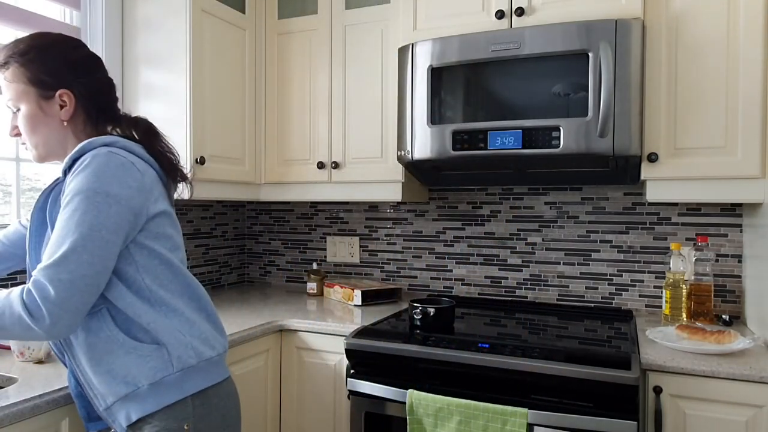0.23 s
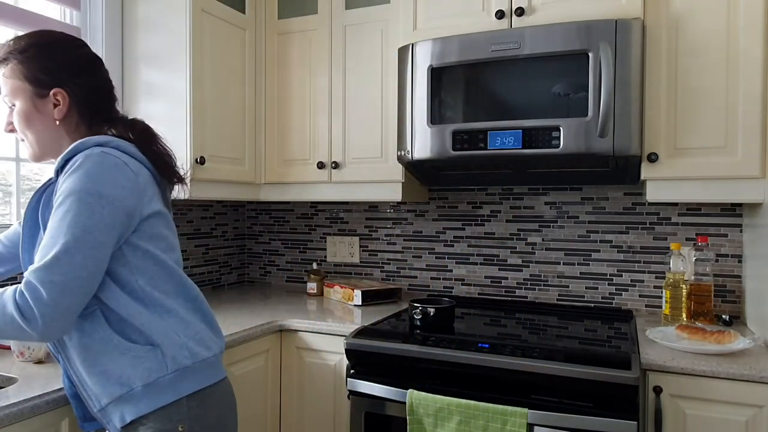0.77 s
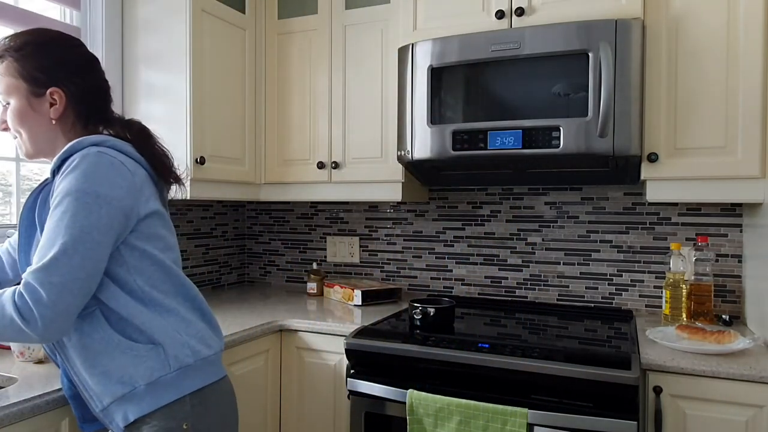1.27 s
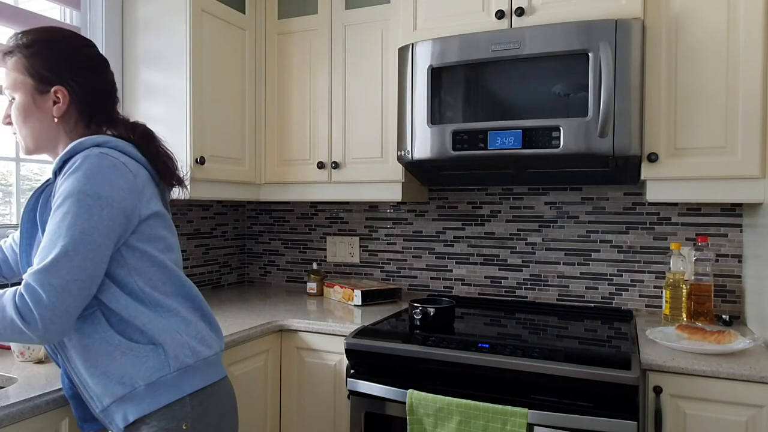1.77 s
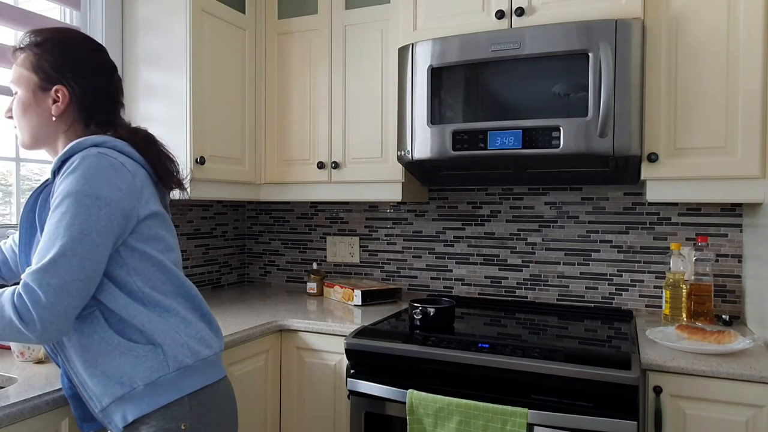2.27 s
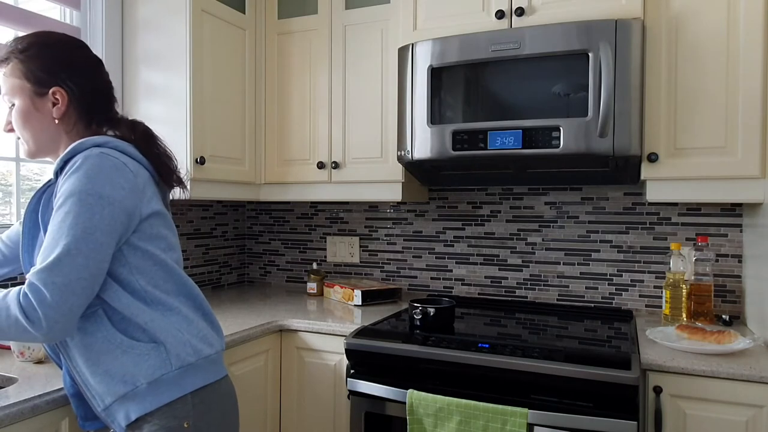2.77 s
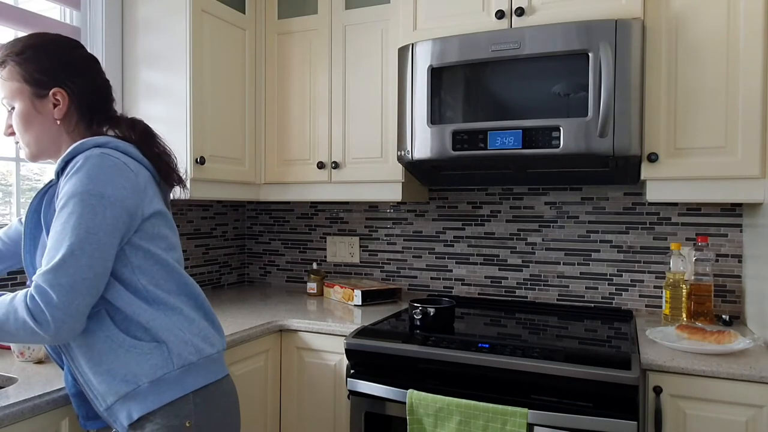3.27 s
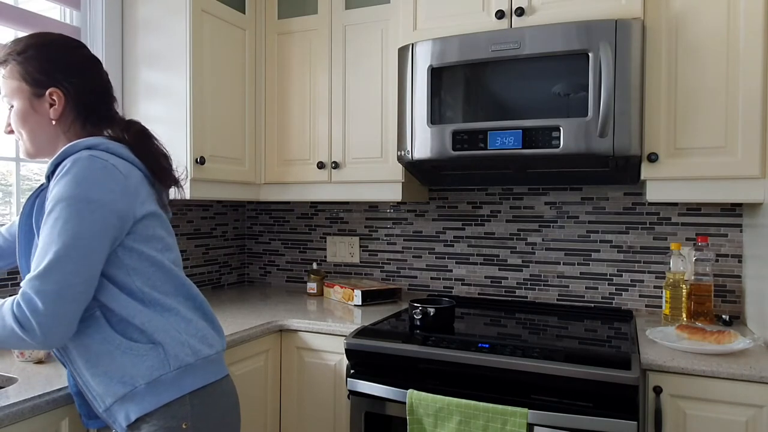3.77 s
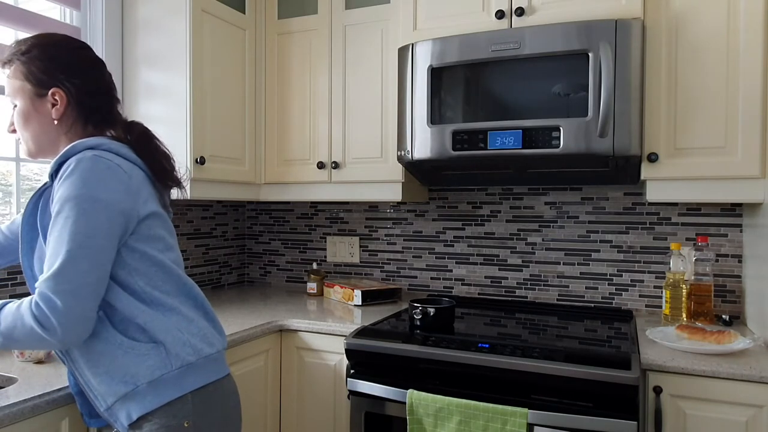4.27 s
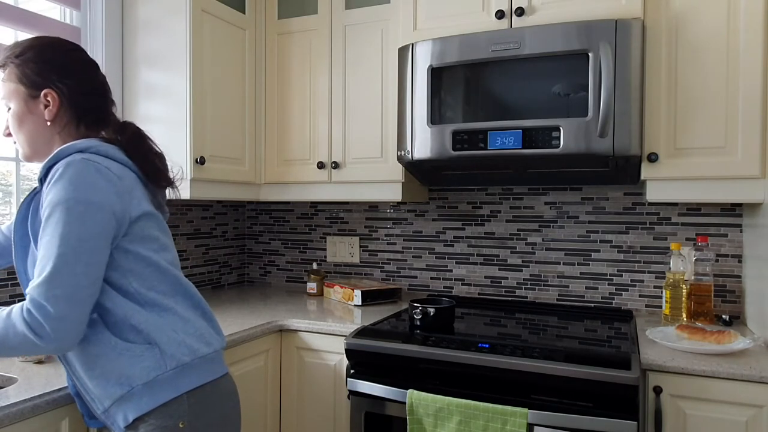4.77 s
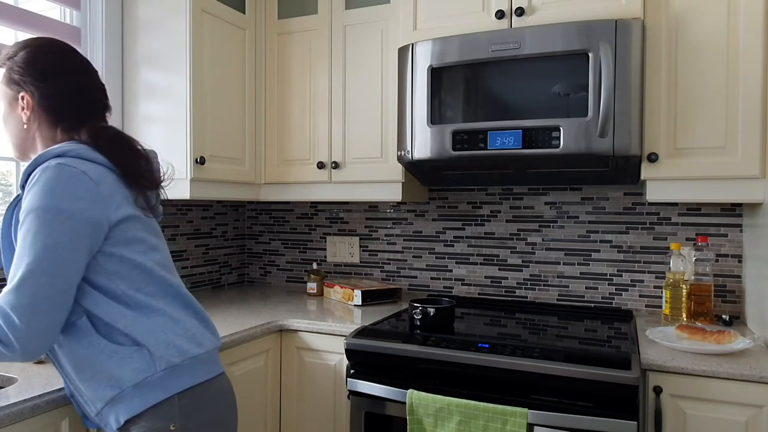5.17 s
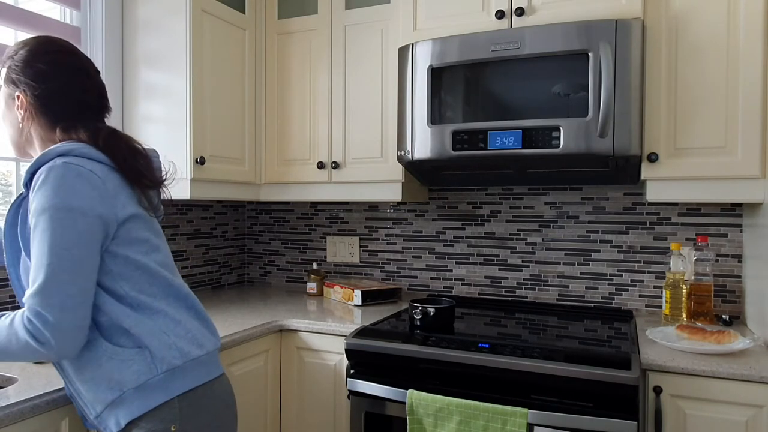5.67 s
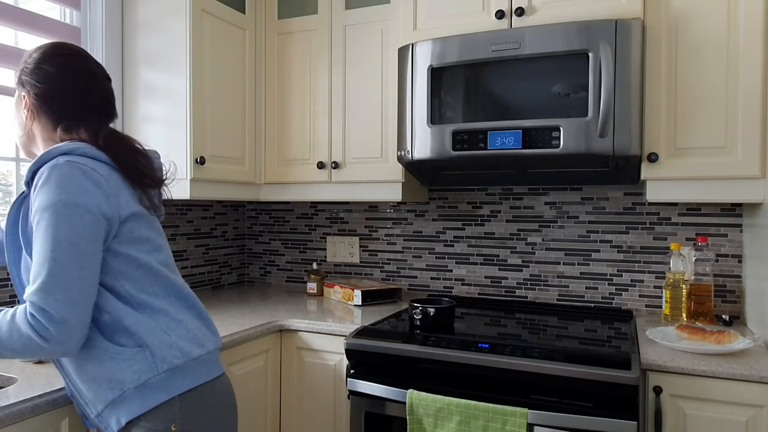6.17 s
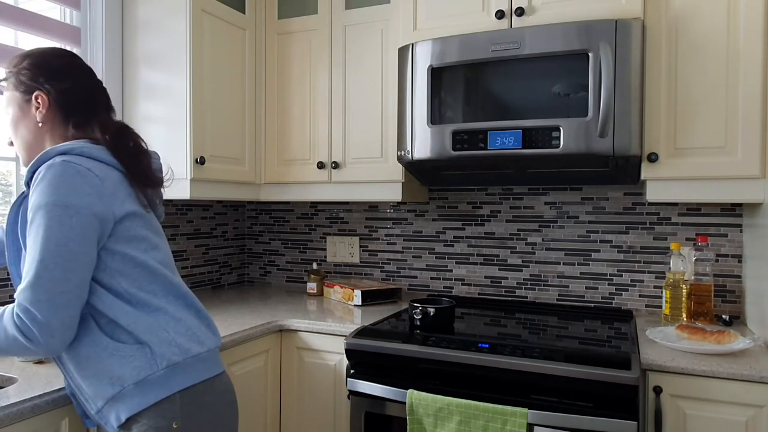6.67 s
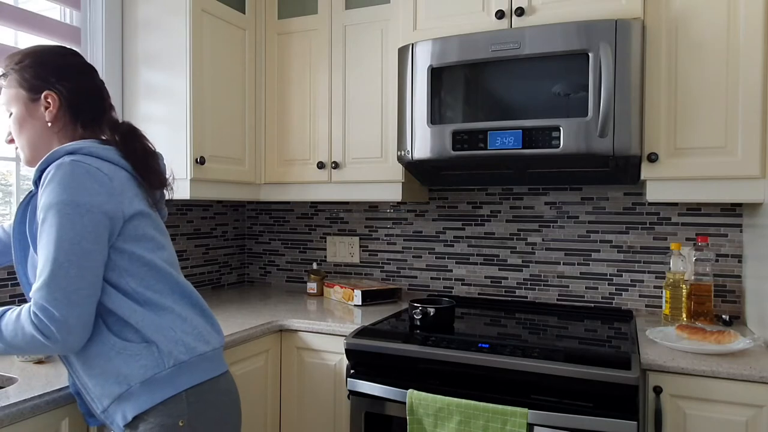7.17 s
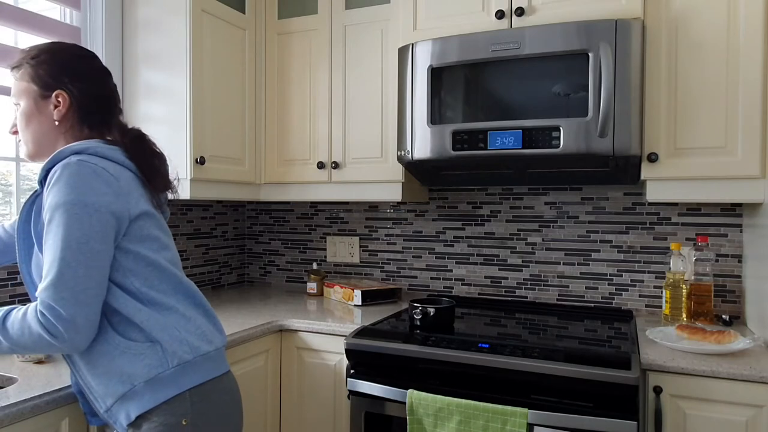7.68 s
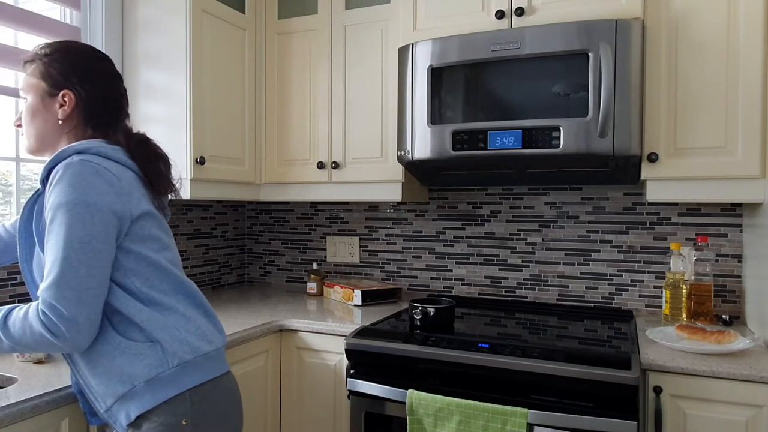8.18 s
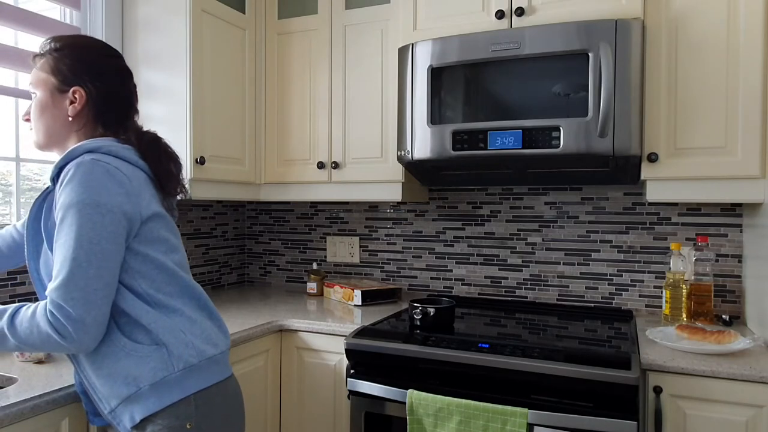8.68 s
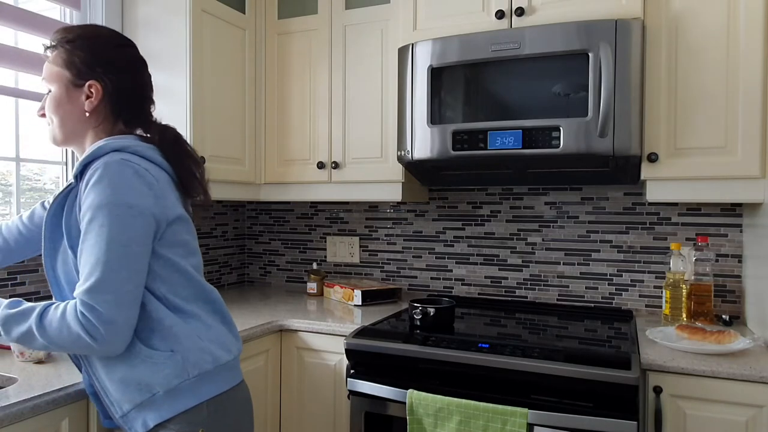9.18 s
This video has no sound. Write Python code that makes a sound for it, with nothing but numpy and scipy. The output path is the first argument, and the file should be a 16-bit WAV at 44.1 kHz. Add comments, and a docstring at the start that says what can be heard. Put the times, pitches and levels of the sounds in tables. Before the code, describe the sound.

A kitchen tap blasts loudly into a bare steel pan, softens into bubbling, fizzing water, then shuts abruptly with a gulp and soft pan bumps.

```python
"""First a hard jet drums on bare steel and sprays: a kitchen tap runs into a saucepan in the sink.
Deeper water then cushions it and fizzes with bubbles; a last gulp shuts the tap, the kitchen rings out
and the pan bumps softly against the sink. The two microphones stand a few steps away, the sink to their left.
Drops are filtered random impacts, bubbles are short rising rings, the steel sink is a bank of resonators,
and reflections with a decaying noise tail make the kitchen."""
import sys
import numpy as np
from scipy import signal
from scipy.fft import rfft, irfft, next_fast_len
from scipy.io import wavfile
from scipy.ndimage import map_coordinates

SR = 44100
rng = np.random.default_rng(int(sys.argv[2]) if len(sys.argv) > 2 else 0)


def store_pcm(level_fs):
    """Save levels as 16-bit WAV."""
    pcm = np.round(np.clip(level_fs, -1, 1) * 32767).astype(np.int16)
    wavfile.write(sys.argv[1], SR, np.atleast_2d(pcm).T)


N = 415422
T = np.arange(N) / SR  # time, s

# All levels are relative: later stages colour and rescale them.
# How hard the jet sprays as it meets steel or water; columns: t/s, level/dB
SPRAYING = [(0.0, -16), (0.02, -20), (0.38, -20.5), (0.43, -23.5), (1.07, -24), (1.14, -27.5), (1.3, -25),
            (1.42, -27), (1.78, -29), (1.85, -27), (2.08, -29), (2.17, -34), (2.24, -31.5), (2.62, -34.7),
            (3.05, -33.8), (3.81, -34.5), (3.93, -30.5), (4.1, -33.5), (4.4, -32.5), (4.72, -30.5),
            (4.98, -32), (5.25, -31.5), (5.43, -33), (5.82, -30.5), (6.22, -31.5), (6.38, -32.5),
            (6.63, -35.5), (7.2, -34.5), (8.56, -35.5)]
# The jet catches the wall of the pan and spits; columns: t/s, level change/dB, length/s
SPITS = [(0.079, 2, 0.015), (0.34, -0.5, .02), (.705, 3.5, 0.013), (.955, 1, 0.011), (1.325, 5.5, 0.01),
         (3.93, 1, 0.026), (4.245, 5.5, 0.013), (4.513, 9, .008), (4.595, 4, 0.013), (5.179, 6.5, .007),
         (5.632, 4, 0.012), (5.678, 2, .008), (5.83, 4, .01), (5.889, 0, .007), (6.01, 2, .008),
         (6.249, 9.5, .008), (6.44, 5, .009)]
# Pockets of air dragged under, the last as the tap shuts;
# columns: t/s, length/s, lowest f/Hz, highest f/Hz, level/dB
GURGLES = [(0.242, 0.14, 560, 882, -31), (4.1, 0.51, 530, 610, -44), (4.26, .04, 750, 1400, -39),
           (4.7, 0.29, 1620, 1950, -41.5), (4.8, .16, 1130, 1320, -43.5), (4.904, 0.37, 772, 903, -42),
           (5.95, .28, 1313, 1900, -45), (8.674, .055, 652, 1560, -38)]
# The pan against the sink; columns: t/s, scuff level/dB, scuff length/s, knock level/dB
BUMPS = [(9.17, -49.5, 0.012, -36), (9.192, -49.5, 0.019, -33), (9.217, -51.5, 0.061, -27),
         (9.276, -57, 0.032, -16), (9.296, -56, 0.15, -30)]

# Spectrum of the droplets as the microphones colour it, with their dip near 7.5 kHz and lift near 9 kHz;
# columns: f/Hz, level per Hz/dB
SPRAY_SPECTRUM = [(1300, -26), (2150, -19), (2450, -4), (2900, -2.5), (3400, -1), (5200, -1), (6000, 0.4),
                  (6900, 1), (7450, -3), (8000, -2), (8750, 3.5), (9400, 4), (10400, 1.5), (11500, 2),
                  (12400, 2.8), (13400, -0.3), (14300, 0.2), (15200, 2), (16000, -0.5)]
# Spectrum of the jet on bare steel; columns: f/Hz, level per Hz/dB
BARE_SPECTRUM = [(180, -45), (300, -13.5), (366, -9.5), (425, -18), (470, -12.5), (581, -4), (690, -2.5),
                 (800, -2.5), (930, -9.5), (1020, -1.5), (1130, -8.5), (1290, 0), (1600, -5), (1960, -6.5),
                 (2160, -7.5), (2430, -3), (3120, -30.5), (5280, -120)]
# Spectrum of the jet in the water that covers the steel; columns: f/Hz, level per Hz/dB
COVERED_SPECTRUM = [(200, -36.5), (300, -10), (420, -4), (500, -0.5), (600, 3), (700, -8), (800, -3.5),
                    (950, -5.5), (1110, -4.5), (1300, -4.5), (1550, -5), (1750, -3.5), (2130, -5.5),
                    (2400, -2), (3120, -34), (5280, -120)]
# Spectrum of the bubble cloud; columns: f/Hz, level per Hz/dB
FIZZ_SPECTRUM = [(1200, -31.5), (2100, -10), (2600, -2.5), (3100, -0.2), (3500, -0.9), (4700, 2), (6500, 0),
                 (7600, -1), (12000, -39), (16000, -31.5)]
# Spectrum of the plunging water's rumble; columns: f/Hz, level per Hz/dB
RUMBLE_SPECTRUM = [(20, -11), (40, -9.5), (62, -15.5), (85, -8), (115, 1), (200, -6), (280, -4.5),
                   (370, 1.5), (520, 6), (620, 2.5), (780, -6.5), (1100, -18.5), (3000, -61)]
# Spectrum of the closing valve's dull thud; columns: f/Hz, level per Hz/dB
THUD_SPECTRUM = [(20, -13), (55, -7), (100, 1), (190, -5), (300, -17), (1000, -53)]
# Spectrum of the pan scuffing the sink; columns: f/Hz, level per Hz/dB
SCUFF_SPECTRUM = [(40, -20), (80, -21.5), (120, 0.5), (175, -1), (245, -5), (350, -4.5), (470, -6.5),
                  (600, -3), (760, -3.5), (1100, -17.5), (2100, -17.5), (3200, -25), (6300, -27),
                  (8000, -36), (15000, -40.5)]
# Spectrum of the quiet room tone; columns: f/Hz, level per Hz/dB
ROOM_TONE_SPECTRUM = [(18, -48), (30, -32), (203, 4.5), (402, -19), (645, -15), (1380, -13), (1530, -28.5),
                      (3940, -18), (15800, -26)]

# Resonances of the pan wall; columns: f/Hz, width/Hz, lift/dB
PAN_MODES = [(1400, 110, 3), (1970, 160, 2.5), (2480, 110, 2), (3210, 25, 3), (3520, 160, 1.5),
             (4600, 45, 2), (5927, 55, 2), (8812, 60, 1.4)]
# Resonances of the sink with the pan in it;
# columns: f/Hz, width/Hz, level when shaken by water/dB, level when bumped/dB
SINK_MODES = [(123, 26, -14, -17), (176, 6, 1.5, -22.5), (218, 11, 0.5, -19), (243.4, 4, -7, -3),
              (491.4, 5.8, -2, -7), (558.6, 3, 1, 4), (581, 40, 2.5, -14.5), (614, 3.2, -2, -4.5)]
# Reverberation of the kitchen; columns: f/Hz, time to decay by 60 dB/s
KITCHEN_DECAY = [(100, 0.55), (500, 0.75), (1600, 0.67), (3500, 0.78), (8000, 0.5), (15000, 0.5)]
# Likeness of the two microphone signals; columns: f/Hz, correlation (-1 opposed, 1 same)
LIKENESS = [(30, -0.66), (70, 0.14), (140, 0.98), (260, 0.68), (550, 0.4), (1000, -0.033), (2000, -0.026),
            (16000, 0.08)]
# Balance of the two microphones; columns: f/Hz, left minus right level/dB
BALANCE = [(200, -0.5), (600, 1.5), (1200, 1), (3200, 0.5), (5000, 2), (6900, 3.5), (7900, 1), (8800, -3),
           (10500, -1), (12000, -0.5), (15500, 2)]

# Water covers the spot where the jet lands
COVER_START_S, COVER_END_S = 2.06, 2.19
# The spray of a jet that plunges smoothly; any more is spatter, fully wild at WILD_DB above calm
CALM_DB, WILD_DB = -33, 2.5
SPUTTER_CALM_DB, SPUTTER_WILD_DB = 1.4, 2  # how deeply the spray wavers
# Level under a calm jet, and dB gained per dB of spatter
STEEL_DB, STEEL_PER_SPATTER = -31, 0.12
WATER_DB, WATER_PER_SPATTER = -39, 0.76
FROTH_DB, FROTH_PER_SPATTER = -31.5, 0.38
RUMBLE_DB, RUMBLE_PER_SPATTER = -44, -0.49  # water that spatters does not plunge
CHURN_DB = -43  # the steady shaking of the sink
SURGE_S, SURGE_DB, SURGE_LENGTH_S = 2.05, 1.7, 0.028  # the drumming swells briefly
FROTH_FULL_S, FROTH_DB_PER_S = 2.3, 7.5  # the bubble cloud builds up until then
BURBLE_PEAK_S = 5.6  # at this depth the jet burbles loudest
SHALLOW_DB_PER_S, DEEP_DB_PER_S = 0.3, 0.9  # growth of the burble before that, muffling after
CLOSING_S = 8.578  # the valve starts to close, and the stream draws less and less air
SPRAY_CLOSE_DB_PER_S, FROTH_CLOSE_DB_PER_S = 130, 90
GULP_S, GULP_DB, GULP_LENGTH_S = 8.67, -43, 0.05  # the valve closes
SLUG_S, IMPACT_CLOSE_DB_PER_S = 8.69, 73  # the last slug of water lands, then the splash dies
SLOSH_S, SLOSH_DB, SLOSH_LENGTH_S = 8.69, 5.5, 0.1  # the pan heaves as the stream slackens
SHUT_S, DRAIN_S = 8.76, 0.024  # the last water lands; time constant of its decay
ROOM_TONE_DB = -64.5
LEFT_LEAD_S = 0.00037  # direct sound reaches the left microphone first
EDGE_HZ = 15930  # upper edge of the sound's band


def gain_of(db):
    """Amplitude factor of a level in dB."""
    return 10 ** (np.asarray(db) / 20)


def evened(x):
    """Scale to an rms of 1."""
    return x / np.sqrt(np.mean(x ** 2) + 1e-20)


def read(points, hz):
    """A spectrum, joined by straight lines on a log-frequency axis."""
    f, value = np.transpose(points)
    return np.interp(np.log(hz + 1), np.log(f + 1), value)


def swell(s, length):
    """A brief bell-shaped rise from 0 to 1 and back."""
    return np.exp(-((T - s) / length) ** 2)


def colour(x, spectrum, modes=(), size=8192):
    """Causal filter: a broad spectrum lifted by ringing resonances; rms 1."""
    hz = np.fft.rfftfreq(size, 1 / SR)
    db = read(spectrum, hz)
    for f, width, lift in modes:
        db = db + lift / (1 + (2 * (hz - f) / width) ** 2)
    # folding the cepstrum forward in time gives minimum phase
    cepstrum = irfft(np.log(gain_of(db)))[:size // 2]
    cepstrum[1:] *= 2
    ring = irfft(np.exp(rfft(cepstrum, size)))[:size // 2]
    return evened(signal.oaconvolve(x, ring[None], axes=1)[:, :N])


def hiss(channels=4):
    """Unrelated noise, by default for four spots in the sink."""
    return rng.standard_normal((channels, N))


def drops(per_s, spread_db):
    """Random impacts: most are small, a few large."""
    push = hiss()
    size = np.minimum(rng.exponential(1, push.shape), 6)
    lands = rng.random(push.shape) < per_s / SR
    return evened(np.sign(push) * gain_of(spread_db * size) * lands)


def sputter(depth_db, slow_hz, fast_hz, count=60):
    """The unsteady jet: a gain that wavers at many rates."""
    t = T[::64]
    rates = np.geomspace(slow_hz, fast_hz, count)[:, None]
    waves = np.sin(2 * np.pi * (rates * t + rng.random((count, 1))))
    return gain_of(depth_db * np.interp(T, t, evened(waves.sum(0))))


def patchy(x, depth_db, span_hz, span_s):
    """Random gains that drift over time and frequency make the noise uneven."""
    hz, s, z = signal.stft(x, SR, nperseg=512)
    knots = rng.standard_normal((80, 900))
    places = np.meshgrid(hz / span_hz, s / span_s, indexing="ij")
    field = map_coordinates(knots, places, order=1, mode="mirror")
    uneven = z * gain_of(depth_db * evened(field))
    return evened(signal.istft(uneven, SR, nperseg=512)[1][:, :N])


def bubbles(low_hz, high_hz, cycles, spread_db, rise, count=9000, size=500, channels=4):
    """Each trapped bubble rings for some cycles and rises in pitch as it nears the surface."""
    when, pitch, strength = rng.random((count, 3)).T[:, :, None]
    turns = low_hz * (high_hz / low_hz) ** pitch * np.arange(size) / SR
    ring = np.exp(-turns / cycles) * np.sin(2 * np.pi * turns * (1 + rise * turns / cycles))
    fade = np.sqrt(np.linspace(1, 0, size))
    ring *= gain_of(-spread_db * np.log(strength + 0.084)) * fade
    # scatter over all channels laid end to end
    at = (when * (channels * N - size)).astype(int) + np.arange(size)
    return evened(np.bincount(at.ravel(), ring.ravel(), channels * N).reshape(channels, N))


def cover():
    """How far water covers the spot where the jet lands, 0 to 1."""
    return np.clip((T - COVER_START_S) / (COVER_END_S - COVER_START_S), 0, 1)


def filling():
    """Gains of spray, impact, fizz, rumble and churn follow spatter, rising water and closing valve."""
    jet_db = np.interp(T, *np.transpose(SPRAYING))
    spray_db = jet_db + sum(db * swell(s, length) for s, db, length in SPITS)
    spatter_db = jet_db - CALM_DB

    closing = np.maximum(T - CLOSING_S, 0)
    dying_db = IMPACT_CLOSE_DB_PER_S * np.maximum(T - SLUG_S, 0)
    slosh_db = SLOSH_DB * swell(SLOSH_S, SLOSH_LENGTH_S)
    depth_db = np.minimum(SHALLOW_DB_PER_S * (T - BURBLE_PEAK_S), DEEP_DB_PER_S * (BURBLE_PEAK_S - T))

    steel_db = STEEL_DB + STEEL_PER_SPATTER * spatter_db + SURGE_DB * swell(SURGE_S, SURGE_LENGTH_S)
    water_db = WATER_DB + WATER_PER_SPATTER * spatter_db + depth_db
    missing_froth_db = FROTH_DB_PER_S * np.maximum(FROTH_FULL_S - T, 0)
    froth_db = FROTH_DB + FROTH_PER_SPATTER * spatter_db - missing_froth_db
    rumble_db = RUMBLE_DB + RUMBLE_PER_SPATTER * spatter_db * cover()
    return gain_of([spray_db - SPRAY_CLOSE_DB_PER_S * closing,
                    steel_db + cover() * (water_db - steel_db) - dying_db,
                    froth_db - FROTH_CLOSE_DB_PER_S * closing,
                    rumble_db + slosh_db,
                    CHURN_DB + slosh_db])


def spray():
    """Droplets tick on steel and water: a steady mist when calm, coarse and sputtering in spatter."""
    wild = np.clip((np.interp(T, *np.transpose(SPRAYING)) - CALM_DB) / WILD_DB, 0, 1)
    fine = drops(per_s=1200, spread_db=3.0)
    mist = gain_of(-3.0) * hiss()
    coarse = gain_of(-4) * wild * drops(per_s=150, spread_db=2.0)
    ticks = patchy(fine + mist + coarse, depth_db=1.5, span_hz=450, span_s=0.014)
    depth_db = SPUTTER_CALM_DB + (SPUTTER_WILD_DB - SPUTTER_CALM_DB) * wild
    wavering = sputter(depth_db, slow_hz=13, fast_hz=71.06)
    return gain_of(3.0) * colour(ticks, SPRAY_SPECTRUM, PAN_MODES) * wavering


def impact():
    """The jet drums and gurgles on the bare pan bottom, then burbles in the water that covers it."""
    covered = cover()
    gurgle = bubbles(low_hz=486.0, high_hz=1477, cycles=9.9, spread_db=2.0, rise=0.027,
                     count=2400, size=1400)
    on_steel = gain_of(-11) * gurgle + drops(per_s=900, spread_db=3.0)
    drum = gain_of(1.5) * colour(on_steel, BARE_SPECTRUM, PAN_MODES)
    burble = bubbles(low_hz=632.4, high_hz=2312, cycles=18.5, spread_db=3.0, rise=0.032,
                     count=2600, size=1000)
    on_water = gain_of(-2.5) * burble + drops(per_s=450, spread_db=0.5)
    splash = gain_of(1.5) * colour(on_water, COVERED_SPECTRUM, PAN_MODES)
    return np.sqrt(1 - covered) * drum + np.sqrt(covered) * splash


def rumble():
    """The plunging water rumbles in the pan: low coloured noise that wavers slowly."""
    return gain_of(-4.0) * colour(hiss(), RUMBLE_SPECTRUM) * sputter(depth_db=3.0, slow_hz=3.3, fast_hz=20)


def sink(churn, rub, knock):
    """The steel sink hums in its modes under churning water and rings when the pan rubs or knocks it."""
    out = 0
    for hz, width, water_db, bump_db in SINK_MODES:
        radius = np.exp(-np.pi * width / SR)  # a narrow mode rings long
        pole = radius * np.exp(2j * np.pi * hz / SR)
        shake = hiss(channels=2)
        rough = (gain_of(water_db) * churn + gain_of(bump_db) * rub) * shake
        struck = gain_of(bump_db) * knock * gain_of([[0], [-10]])
        ringing = signal.lfilter([np.sqrt(2 * (1 - radius * radius))], [1, -pole], rough + struck)
        out = out + ringing.imag
    return out * gain_of([[0], [-6]])  # rows: common and opposed sound


def fizz():
    """The aerated stream drives a cloud of small bubbles under the surface."""
    cloud = bubbles(low_hz=2017, high_hz=6896, cycles=24.0, spread_db=0.4, rise=0.027, count=6000)
    froth = gain_of(-3.5) * cloud + drops(per_s=1000, spread_db=5.0)
    return colour(patchy(froth, depth_db=1.3, span_hz=457, span_s=0.028), FIZZ_SPECTRUM, PAN_MODES)


def gurgles():
    """Each pocket of air breaks into a short run of bubbles within its own pitch range."""
    out = 0
    for s, length, low_hz, high_hz, db in GURGLES:
        run = bubbles(low_hz, high_hz, cycles=16.0, spread_db=2.2, rise=0.02, count=1100, size=900)
        out = out + gain_of(db) * swell(s, length) * run
    return out


def room_tone():
    """The quiet kitchen: faint steady coloured noise."""
    return gain_of(ROOM_TONE_DB) * colour(hiss(channels=2), ROOM_TONE_SPECTRUM)


def gulp():
    """The closing valve thuds dully in the pipe."""
    thud = colour(hiss(channels=2), THUD_SPECTRUM) * gain_of([[0], [-9]])  # common, opposed
    return gain_of(GULP_DB) * swell(GULP_S, GULP_LENGTH_S) * thud


def bumps():
    """The pan meets the sink: decaying strengths of rubbing, and single-sample knocks."""
    rub = sum(gain_of(db) * (T >= s) * np.exp(-abs(T - s) / length) for s, db, length, _ in BUMPS)
    knock = sum(gain_of(db) * (np.arange(N) == round(s * SR)) for s, _, _, db in BUMPS)
    return rub, knock


def scuffs(rub):
    """The pan scrapes softly on the sink: coloured noise that follows the rubbing."""
    return gain_of(-0.5) * rub * colour(hiss(), SCUFF_SPECTRUM)


def kitchen(x, direct_db, early_db, early_s, size=30000):
    """Each spot has its own paths: direct, off the sink and cupboards, and as a reverberant tail."""
    t, out = np.arange(size) / SR, 0
    left, right = np.sinc(t * SR), np.sinc((t - LEFT_LEAD_S) * SR)
    direct = np.array([left + right, left - right])  # common, opposed
    for spot in x:
        hz, s, z = signal.stft(rng.standard_normal((2, size)), SR, nperseg=256)
        decay = gain_of(-60 * s / read(KITCHEN_DECAY, hz)[:, None])
        tail = evened(signal.istft(z * decay, SR, nperseg=256)[1][:, :size])
        sparse = rng.standard_normal((2, size)) * (rng.random((2, size)) < 900 / SR)
        early = evened(sparse * np.exp(-t / early_s))
        paths = tail + gain_of(early_db) * early + gain_of(direct_db) * evened(direct)
        paths = evened(paths) / np.sqrt(size * len(x))
        # a reversed lead-in, cut off again, so that the tap is already running
        running = np.concatenate([spot[size:0:-1], spot])
        out = out + signal.oaconvolve(running[None], paths, axes=1)[:, size:size + N]
    return out


def microphones(x):
    """Common and opposed sound mix into left and right, with likeness and balance set by frequency."""
    size = next_fast_len(N)
    hz, (common, opposed) = np.fft.rfftfreq(size, 1 / SR), rfft(x, size)
    same = np.clip(read(LIKENESS, hz), -1, 1)
    lean = gain_of(read(BALANCE, hz) / 2)
    mid, side = common * np.sqrt((1 + same) / 2), opposed * np.sqrt((1 - same) / 2)
    return irfft(np.array([(mid + side) * lean, (mid - side) / lean]), size)[:, :N]


def scene():
    """Water and scuffs fill the kitchen; the hum of the sink and the thud of the valve arrive directly."""
    spray_gain, impact_gain, fizz_gain, rumble_gain, churn_gain = filling()
    flow = np.exp(-np.maximum(T - SHUT_S, 0) / DRAIN_S)
    water = spray_gain * spray() + impact_gain * impact() + fizz_gain * fizz()
    water = water + rumble_gain * rumble() + gurgles()
    rub, knock = bumps()
    heard = kitchen(flow * water + scuffs(rub), direct_db=-5, early_db=-1.0, early_s=0.024)
    churn = gain_of(-6.5) * flow * churn_gain * sputter(depth_db=2.0, slow_hz=1.5, fast_hz=8)
    hum = sink(churn, rub=gain_of(0.5) * rub, knock=knock)
    quiet = room_tone()
    return microphones(gain_of(3.5) * heard + hum + gulp() + quiet)


def record(dry):
    """Band limit of the whole sound: a steep low-pass filter."""
    low_pass = signal.firwin(1023, EDGE_HZ, window=("kaiser", 8), fs=SR)
    return signal.oaconvolve(dry, low_pass[None], "same")


dry = scene()
out = record(dry)
store_pcm(out)
```